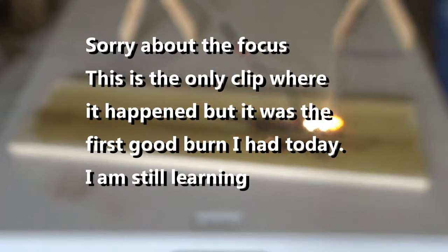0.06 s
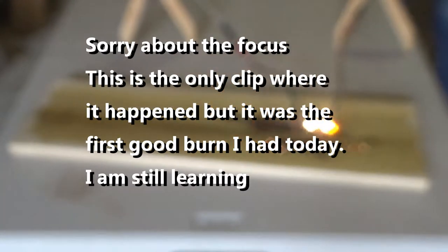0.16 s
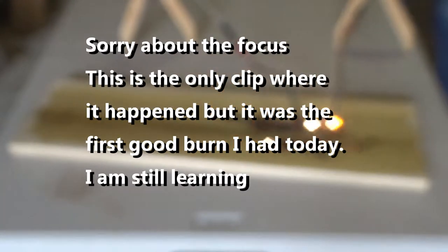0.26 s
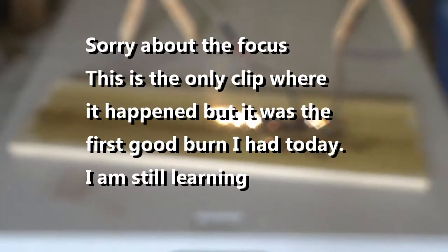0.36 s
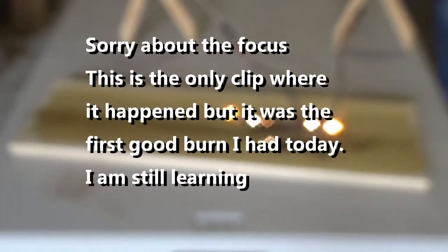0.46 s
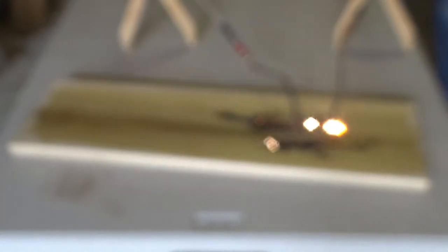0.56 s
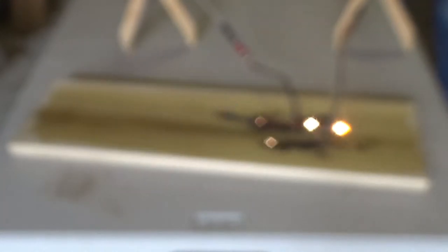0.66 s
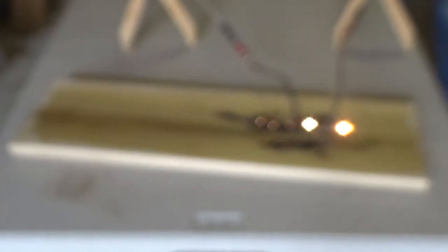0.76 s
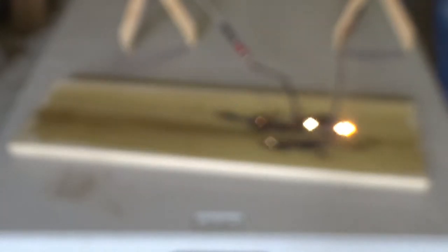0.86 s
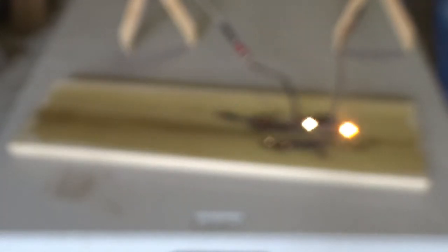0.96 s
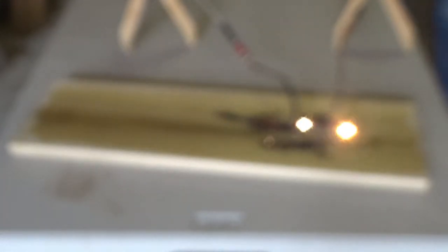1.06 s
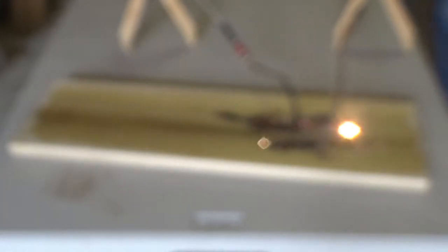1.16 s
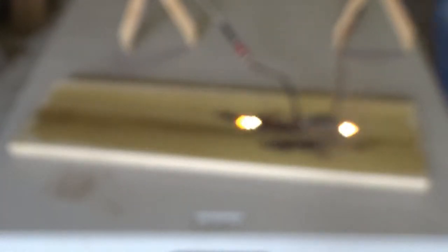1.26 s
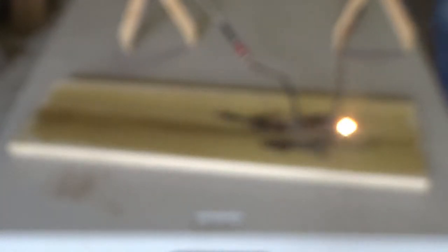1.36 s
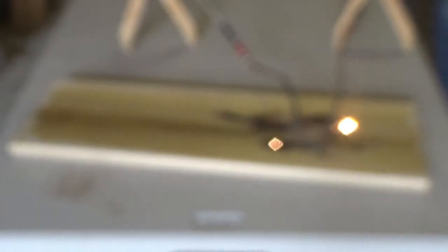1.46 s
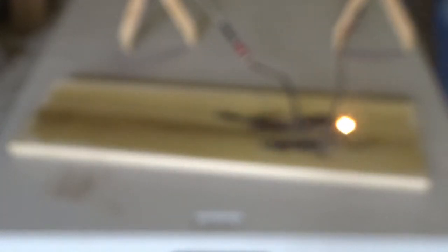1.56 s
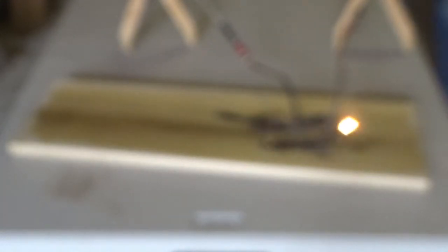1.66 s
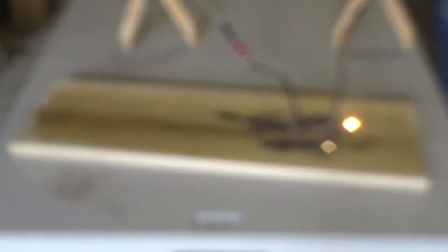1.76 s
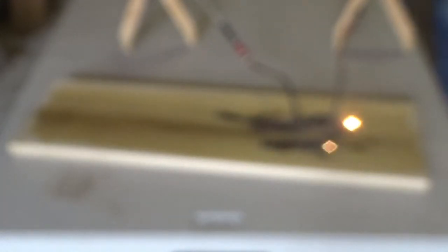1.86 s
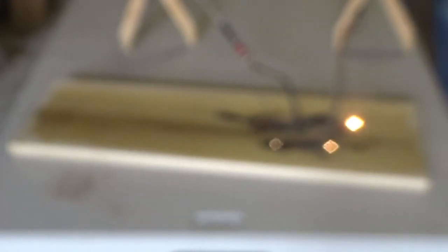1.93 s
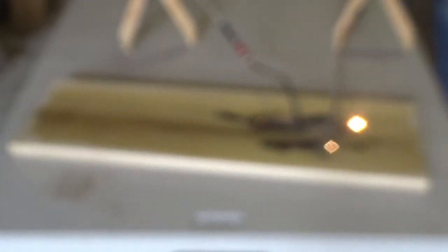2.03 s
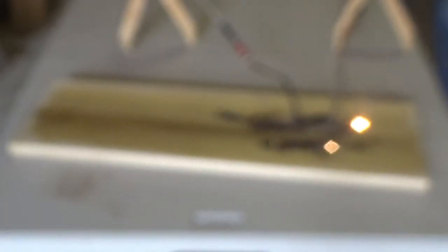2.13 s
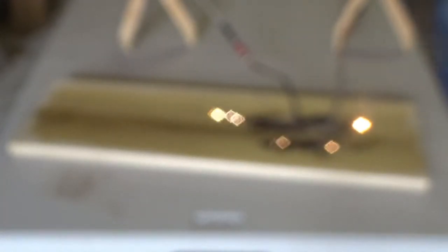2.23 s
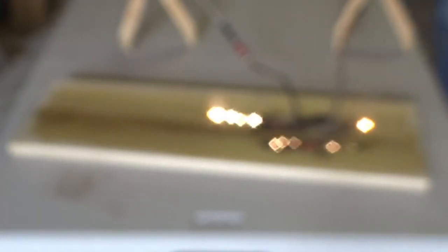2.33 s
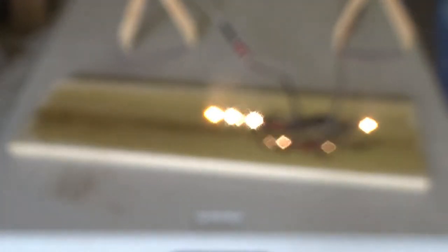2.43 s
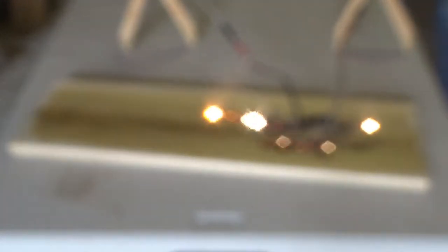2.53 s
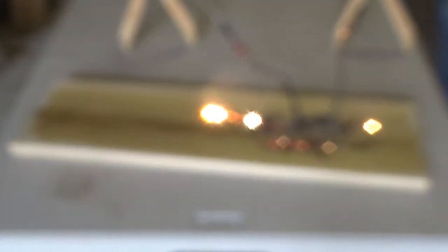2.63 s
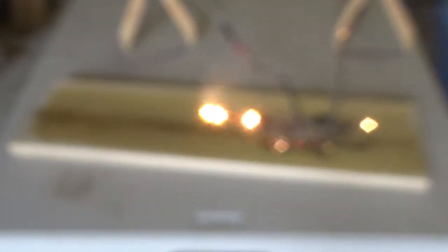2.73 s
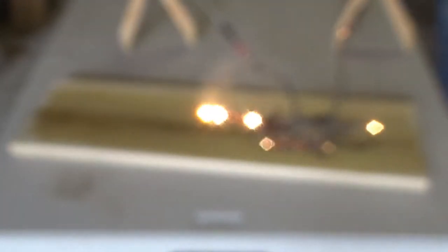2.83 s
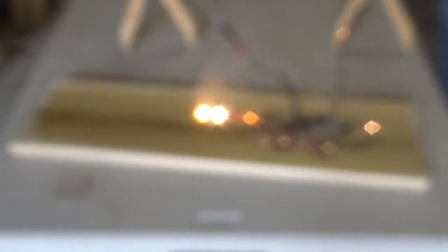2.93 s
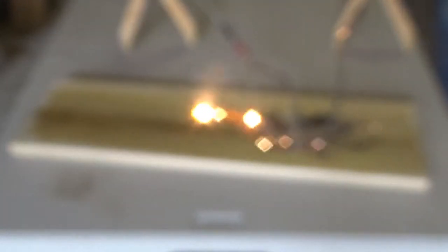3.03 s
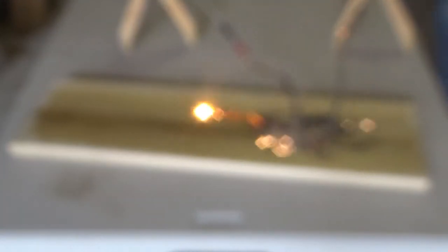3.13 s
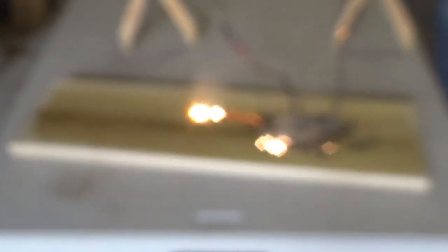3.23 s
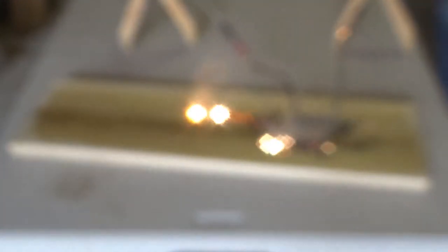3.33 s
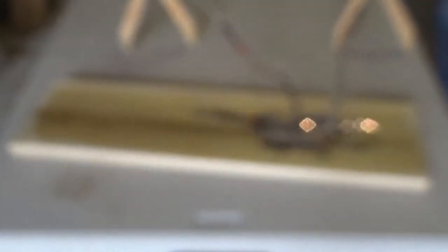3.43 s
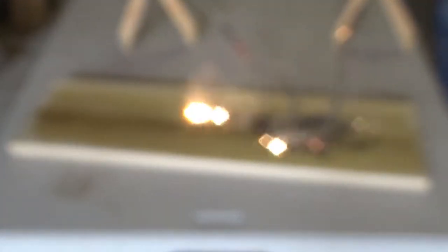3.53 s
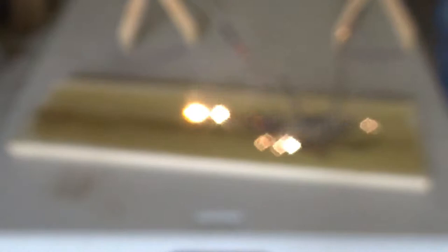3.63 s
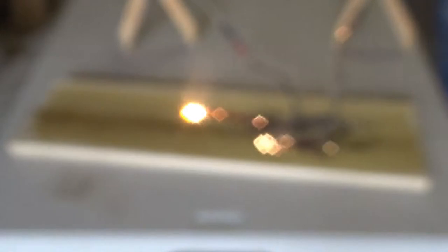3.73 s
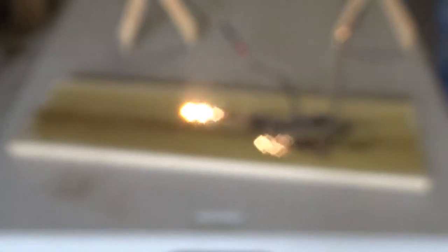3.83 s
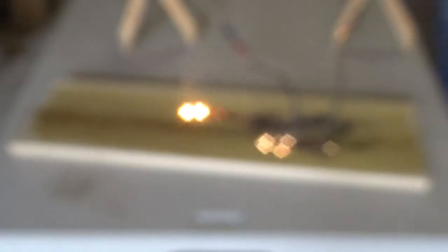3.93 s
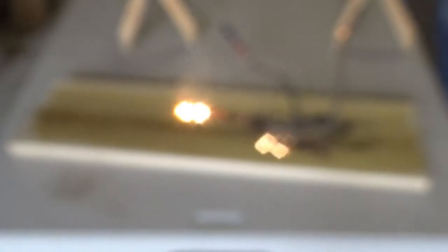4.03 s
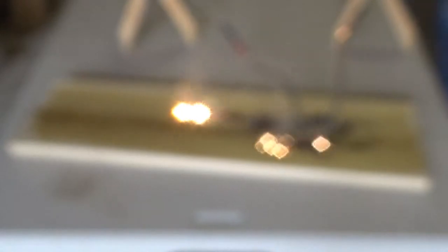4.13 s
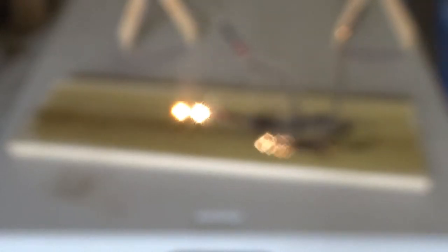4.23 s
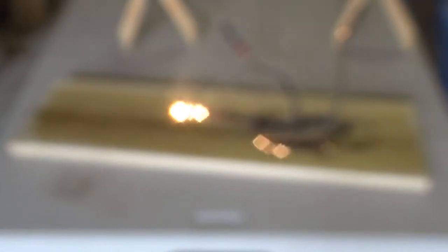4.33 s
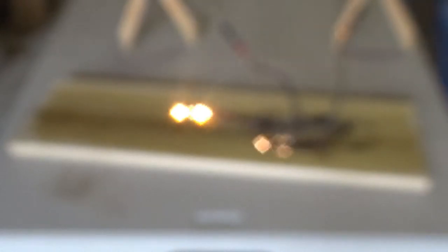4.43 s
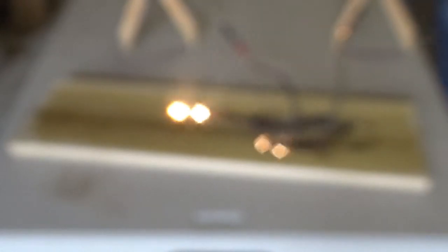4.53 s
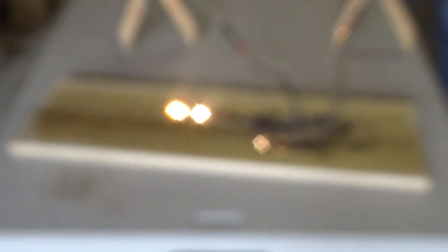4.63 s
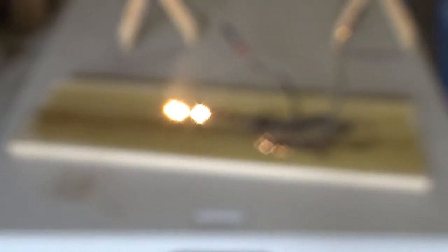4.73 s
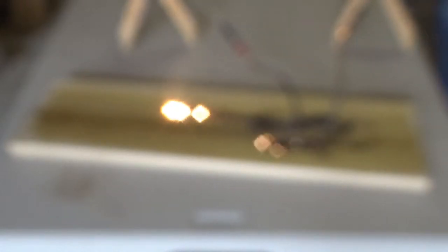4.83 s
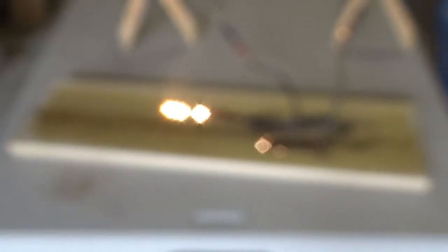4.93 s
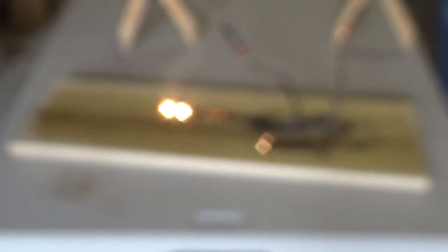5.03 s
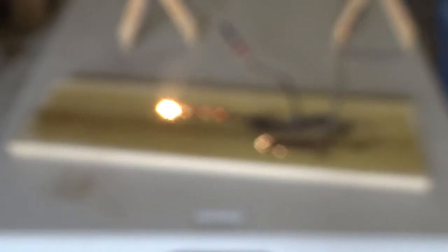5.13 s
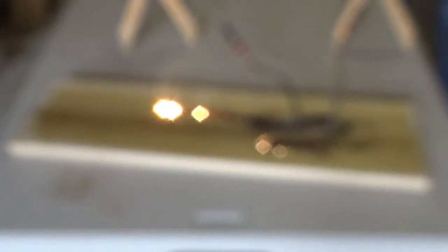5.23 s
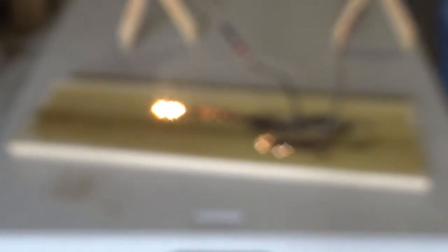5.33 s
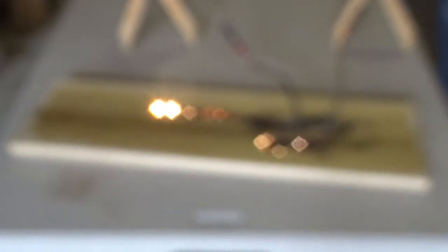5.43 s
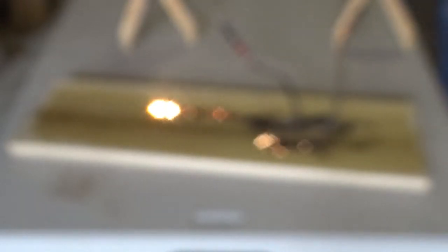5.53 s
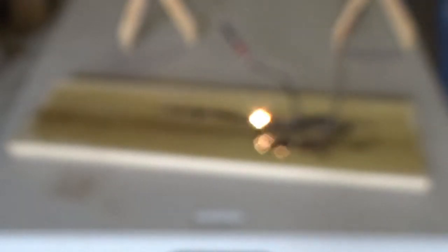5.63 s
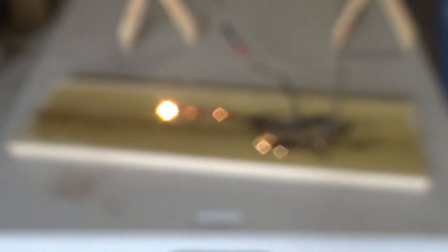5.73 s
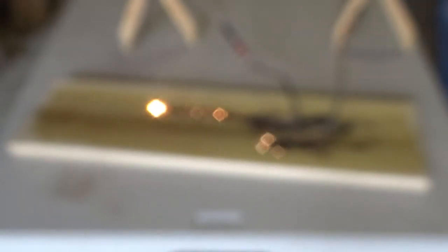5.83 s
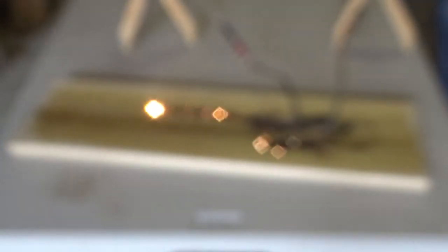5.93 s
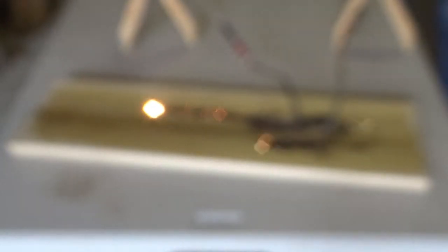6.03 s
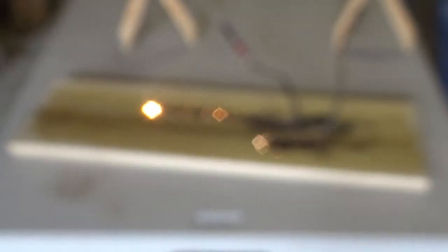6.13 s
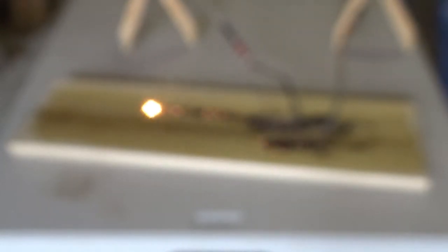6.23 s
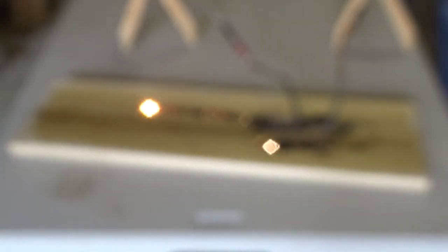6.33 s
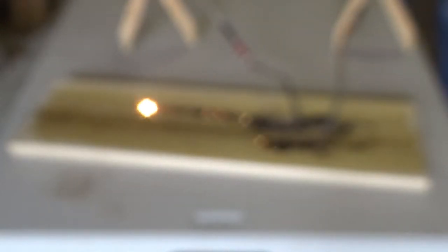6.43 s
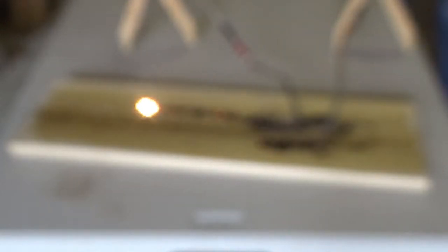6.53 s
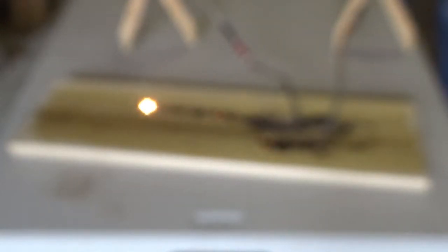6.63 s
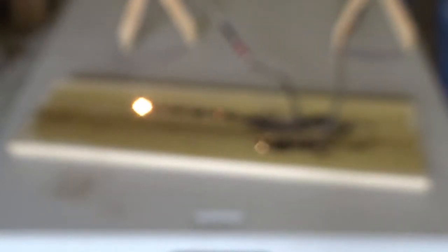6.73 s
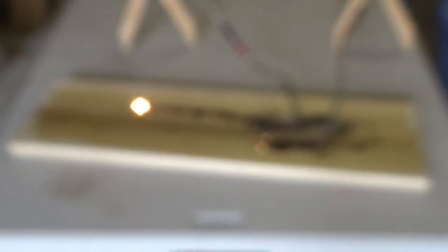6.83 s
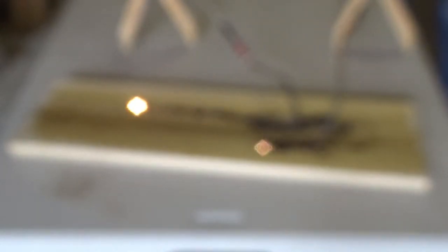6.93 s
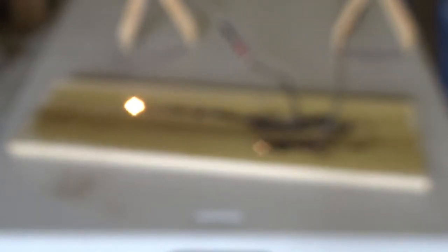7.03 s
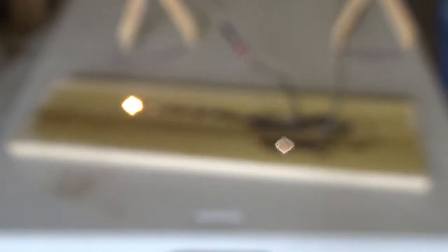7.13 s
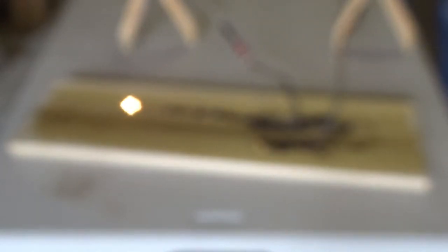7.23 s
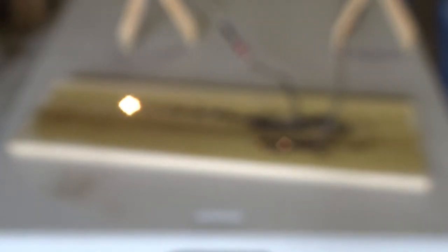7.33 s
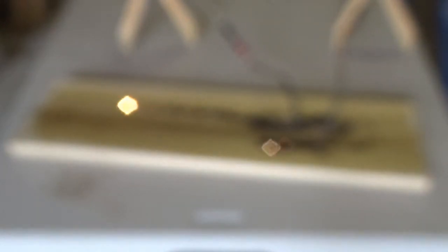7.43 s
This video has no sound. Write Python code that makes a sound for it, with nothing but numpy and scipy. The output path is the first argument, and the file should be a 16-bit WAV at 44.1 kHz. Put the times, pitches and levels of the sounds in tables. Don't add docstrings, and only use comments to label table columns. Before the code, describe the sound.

Close in a small workshop, electric arcs burn along a wet wooden board: a steady, raspy high buzz, dense bright crackling and boiling hiss. Hard snaps jump out irregularly. Around the middle the arc cuts out for an instant, exposing a thin transformer hum, then restrikes. A faint distant engine changes gear behind it. The buzz thins and the crackle weakens at the end. Stereo microphones catch short, hard room reflections.

```python
import sys
import numpy as np
from scipy import signal
from scipy.fft import rfft, irfft, next_fast_len
from scipy.io import wavfile
from scipy.ndimage import uniform_filter1d

SR = 44100
rng = np.random.default_rng(int(sys.argv[2]) if len(sys.argv) > 2 else 0)


def bounce(signal):
    frames = np.transpose(np.atleast_2d(signal))
    limited = np.clip(frames, -1, 1)
    pcm = np.round(limited * 32767).astype(np.int16)
    wavfile.write(sys.argv[1], SR, pcm)


def natural_amplitude(level_db):
    exponent = np.asarray(level_db, float) / 20
    return 10 ** exponent


N = 329427
T = np.arange(N) / SR
LEFT_RIGHT = np.array([[1], [-1]])

CYCLE_HZ = 240.0
CYCLES = T * CYCLE_HZ
STRIKE, BURN, THUMP = 0.425, 0.30, 0.275

# [t/s, spark strength level/dB, gas thump level/dB]
BURNS = [(0, -42, -55), (.44, -43, -45.5), (.6, -45.5, -50), (1.1, -45.5, -58), (1.75, -47.5, -60),
         (2.33, -47.5, -68), (2.62, -41, -46.5), (3.1, -40, -48.5), (3.46, -41, -45), (3.8, -41.5, -47),
         (4.02, -40.5, -52), (4.2, -42.5, -47), (4.97, -43.5, -53.5), (5.06, -42.5, -56), (6.6, -44, -71.5),
         (6.86, -48.5, -71.5), (7.34, -54.5, -75), (7.39, -60, -76)]
# [t/s, swell level/dB, dull sparks and steam against bright sparks level/dB]
FLARES = [(0.05, -2.5, -6), (0.239, -2, 2), (0.434, 2, 4.3), (0.534, -1, 3.5), (0.853, 2.2, -0.0),
          (1.063, -1.6, 3), (1.132, -3.5, 0), (1.312, 2, 6), (1.726, 2.5, 12.5), (2.18, 1.5, 4),
          (2.315, -3.5, -4), (2.913, -2.5, 1.5), (3.766, 2.3, -4), (4.24, -1, -3), (4.51, 5, 0),
          (4.684, -1.5, 0), (4.884, 3.5, -4), (5.113, 1.5, -6), (5.433, -2, -7), (5.807, -0.2, 7),
          (5.882, -1.5, 7), (6.136, 1.5, 1), (6.231, 2.3, 3), (6.316, -0.5, -2), (6.4, -0.5, -2.5),
          (6.53, 0.5, 3), (6.854, -3.5, 9), (6.994, 2.5, 2)]
FLARE_S = 0.024


def rms_one(x):
    return x / np.sqrt(np.mean(x ** 2) + 1e-20)


def in_time(rows):
    s, *columns = np.transpose(rows)
    return [np.interp(T, s, column) for column in columns]


def band(x, low_hz, high_hz):
    edges_hz = [low_hz, min(high_hz, 0.45 * SR)]
    return signal.sosfilt(signal.butter(2, edges_hz, "band", fs=SR, output="sos"), x)


def drift(rate_hz):
    r = np.exp(-80 * np.pi * rate_hz / SR)
    slow = signal.lfilter([1], [1, -2 * r, r * r], rng.standard_normal(N // 40 + 2002))
    slow = rms_one(slow[2000:])
    return np.interp(np.arange(N) / 40, np.arange(len(slow)), slow)


def coloured(x, spectrum):
    hz, level_db = np.transpose(spectrum)
    size = next_fast_len(N)
    log_hz = np.log(np.arange(1, size // 2 + 2) * SR / size)
    gain = natural_amplitude(np.interp(log_hz, np.log(hz), level_db))
    return rms_one(irfft(rfft(x, size) * gain, size)[:N])


def ring(clicks, hz, cycles):
    r = natural_amplitude(-60 * hz / (cycles * SR))
    w = 2 * np.pi * min(hz, 19000) / SR
    return signal.lfilter([0, np.sin(w)], [1, -2 * r * np.cos(w), r * r], clicks + 1e-18)


def swells(s, size, width_s):
    t = np.arange(0, N + 64, 64) / SR
    bells = np.exp(-((t[:, None] - s) / width_s) ** 2) @ size
    return np.interp(T, t, bells)


def alight():
    out_s, back_s = 3.4712, 3.5412
    recovery = np.clip(0.4 + (T - back_s) / 0.018, 0, 1)
    return uniform_filter1d((T < out_s) + (T > back_s) * recovery, size=40)


def strength():
    s, swell_db, dull_db = np.transpose(FLARES)
    spark_db = in_time(BURNS)[0]
    return spark_db + swells(s, swell_db, FLARE_S), swells(s, dull_db, FLARE_S)


def law(usual_db, spark_share, thump_share, wander_db):
    spark_db, thump_db = in_time(BURNS)
    spark_swing, thump_swing = spark_db + 43, thump_db + 54
    return usual_db + spark_share * spark_swing + thump_share * thump_swing + wander_db * drift(4.2)


def air(apart=0.29):
    # [f/Hz, level/dB]
    air_tone = [(100, -26), (200, -3), (400, 0), (1500, 1.5), (3500, 0.5), (6000, -16), (16000, -21.5)]
    # [f/Hz, level/dB]
    rumble_tone = [(15, -14), (70, -14), (115, 5), (160, 4), (250, -29)]
    mid, side = (coloured(rng.standard_normal(N), air_tone) for _ in range(2))
    low, low_side = (natural_amplitude(-74 + 2.0 * drift(3.0)) * coloured(rng.standard_normal(N), rumble_tone)
                     for _ in range(2))
    noise = natural_amplitude(-53) * (mid + apart * side * LEFT_RIGHT)
    return noise + low + 0.42 * low_side * LEFT_RIGHT


def bumps():
    # [t/s, peak level/dB]
    knocks = [(0.048, -75), (0.45, -68), (0.681, -62), (1.144, -66), (1.687, -63), (1.982, -63),
              (2.274, -64), (2.85, -68), (3.104, -69), (4.143, -56), (4.342, -60), (5.129, -56),
              (5.536, -55), (6.058, -58)]
    width_s = 0.036
    s, peak_db = np.transpose(knocks)
    mid, side = (rms_one(band(rng.standard_normal(N), 24, 127)) for _ in range(2))
    return swells(s + width_s, natural_amplitude(peak_db - 6.5), width_s) * (mid + 0.32 * side * LEFT_RIGHT)


def engine():
    # [t/s, f/Hz, level/dB]
    gears = [
        [(0, 373.6, -70), (.55, 402, -67), (1.0, 455, -71), (1.4, 508, -66), (1.75, 563, -82), (1.8, 568, -94)],
        [(.3, 578, -92), (.36, 577, -60), (.6, 586, -63), (.85, 568, -58.5), (1.08, 557, -70), (1.2, 552, -77)],
        [(1.93, 460, -77), (2.05, 440, -63), (2.4, 452, -66), (2.8, 472, -62), (2.9, 480, -97)],
        [(2.8, 369, -81), (3.3, 369, -71), (4.5, 367, -70.5), (5.7, 368.8, -68.5), (6.4, 367, -65),
         (6.7, 370, -76), (7.1, 370, -63.5), (7.3, 363, -68), (7.4, 369, -80)],
    ]
    out = 0
    for gear in gears:
        hz, db = in_time(gear)
        level = natural_amplitude(db + 1.0 * drift(2.0))
        out = out + level * np.sin(2 * np.pi * np.cumsum(hz + 1.05 * drift(6.8)) / SR)
    return np.sqrt(2) * out


def transformer():
    # [f/Hz, rms level/dB]
    tones = [(479.1, -57), (963.6, -55), (1443, -51), (1916, -50), (2078, -64), (2401, -51), (3354, -49)]
    hum = 0
    for hz, db in tones:
        level = np.sqrt(2) * natural_amplitude(db - hz / 450 + 1.4 * drift(30.0))
        hum = hum + level * np.cos(2 * np.pi * (hz * T + rng.random()))
    return (1 - alight()) * hum


def buzz(flutter=0.076):
    orders = (2, 4, 6, 8, 10, 14)
    # [usual level/dB, share of spark swing, share of thump swing]
    laws = [(-51.5, .4, .2), (-52.5, 0.01, 0.8), (-50.5, 0.59, -0.065), (-55.5, .5, -0.25),
            (-52.5, 0.43, 0.14), (-53.5, 0.46, 0.28)]
    faint = [(3, 2), (5, 10), (9, 10), (12, 8), (13, 14), (15, 14), (17, 14), (19, 14), (23, 14), (25, 14),
             (27, 14), (28, 14)]
    faint_db = [-15, -13, -12, -5, -8, -13, -13, -12, -12, -12, -13, -12]
    levels = {k: law(*row, 0.7) for k, row in zip(orders, laws)}
    s, swell_db, _ = np.transpose(FLARES)
    levels[4] = levels[4] + 0.3 * swells(s, swell_db, FLARE_S) + 1.4 * drift(14.0)
    levels.update({k: levels[leader] + db for (k, leader), db in zip(faint, faint_db)})
    out = 0
    for k, db in levels.items():
        at_strike = k in (8, 12) or k > 14
        crest = STRIKE + 0.02 if at_strike else THUMP + 0.5 + 0.09 / k
        level = np.sqrt(2) * natural_amplitude(db) * (1 + flutter * np.sqrt(k) * drift(41.0))
        out = out + level * np.cos(2 * np.pi * k * (CYCLES - crest))
    return alight() * out


def sizzle(patchy_db=2.5):
    # (level against sparks/dB, share of spark swing, share of thump swing, wander/dB)
    steam = (-6.5, 0.07, 0.36, 0.5)
    # [f/Hz, level/dB]
    hiss = [(150, -15.5), (300, -12), (500, -2), (800, -6.5), (1500, -0.5), (2600, 2.5), (3200, -4.5),
            (5000, -12)]
    mid_db, dull_db = strength()
    steam_db = law(*steam) + dull_db
    beat = 1 + 0.13 * np.cos(4 * np.pi * (CYCLES - THUMP))
    noise = coloured(rng.standard_normal(N) * beat * natural_amplitude(patchy_db * drift(35.0)), hiss)
    return alight() * natural_amplitude(mid_db + steam_db - 0.5) * noise


def snaps(swell=10.6, drop_db=-9.5):
    # [t/s, peak level/dB, top over middle level/dB]
    loud = [(0.0937, -15, 9), (0.1692, -11, 14), (0.2691, -11, 16), (0.4273, -19, 1), (0.5363, -7.5, -3),
            (0.851, -15, 1), (1.304, -17, -21), (1.473, -12, 4), (1.712, -13, -2), (2.4008, -13, -5),
            (2.6847, -7, -5), (2.968, -9, -4), (3.022, -11, -3), (3.4605, -17, 3), (3.8109, -10, -9),
            (3.914, -16, 2), (4.1816, -9, 6), (4.366, -10, 13), (4.498, -13, 0), (4.5025, -16, 9),
            (7.348, -24, 1), (4.927, -10, 6), (5.91, -16, 4), (6.81, -25, -3), (6.1182, -10, 2),
            (6.1484, -3, 27), (6.2397, -8, 15), (6.2767, -9.5, 1), (6.3857, -11, -2), (6.523, -13, 4)]
    # (t/s, peak level/dB, top over middle level/dB)
    first = (3.538, -28, 3)
    count = 40
    chance = rng.random(count)
    size, tint = rng.standard_normal((2, count))
    when = (np.floor(5 + chance * (N / SR * CYCLE_HZ - 9)) + STRIKE + BURN / 3) / CYCLE_HZ
    at = (when * SR).astype(int)
    small_db = strength()[0][at] + 14 + 0.5 * size - 60 * (alight()[at] < 1)
    small = zip(when, small_db, 7.5 + 6.3 * tint)

    out = np.zeros(N + 400)
    around = np.arange(-60, 140)
    for s, peak_db, top_db in [*loud, first, *small]:
        tear = 0.49 * rng.standard_normal(200) * np.exp(-abs(around) / swell)
        tear = tear - 0.85 * (around == -2)
        shape = 0.44 * band(tear, 1000, 4400) + band(tear, 4200, 8000)
        shape = shape + natural_amplitude(top_db - 1.0) * band(tear, 8800, 13000)
        level = natural_amplitude(min(peak_db + drop_db, -19))
        out[round(s * SR) - 60:][:200] += level * shape / abs(shape).max()
    return out[:N]


def sparks(per_s=12000., spread_db=2.0, cycle_db=1.5, tint_db=1.0, between_db=-24.0, ring_db=-14.0):
    # (level against sparks/dB, share of spark swing, share of thump swing, wander/dB)
    dull = (-4, -0.48, 0.19, 1.4)
    bright = (1.15, -0.23, 0.053, 1.2)
    # [f/Hz, level/dB, length/cycles]
    bench = [(6690, 5, 61), (8240, 0.5, 200), (9300, 0.5, 160), (15700, 5.5, 29)]
    mid_db, dull_db = strength()
    low_db, top_db = law(*dull) + 0.23 * dull_db, law(*bright)

    halves = 2 * (CYCLES - STRIKE + 1)
    which = halves.astype(int)
    weak = which % 2
    part = halves % 1 / (2 * np.where(weak, 0.11, BURN))
    burning = np.clip(part / 0.19, 0, 1) * np.clip((1.15 - part) / 0.5, 0, 1) * natural_amplitude(-4.5 * part)
    burning = burning + natural_amplitude(-9.0 - 0.9 * part) * weak
    burst = rng.standard_normal((which[-1] + 1, 4))[which]
    weak_db = (-9.5 + 2.5 + drift(3.1)) * weak
    gate = burning * natural_amplitude(weak_db + cycle_db * burst[:, 0] + 0.98 * drift(31.0)) + natural_amplitude(between_db)
    lit = alight()

    big_size = natural_amplitude(1.5 + spread_db * np.minimum(rng.exponential(1, N), 2))
    big = (rng.random(N) < 800. / SR) * rng.choice([-1, 1], N) * big_size
    bands = [(2790, 5450, low_db - 0.7), (5210, 9500, -0.0046), (8560, 18300, top_db + 0.33)]
    out = 0
    for k, (low_hz, high_hz, level_db) in enumerate(bands):
        size = natural_amplitude(spread_db * rng.exponential(1, N))
        clicks = (rng.random(N) < per_s / SR) * rng.choice([-1, 1], N) * size
        clicks = (clicks + big) * gate * lit
        layer = band(clicks * natural_amplitude(tint_db * burst[:, k + 1]), low_hz, high_hz)
        evened = layer / np.sqrt(uniform_filter1d(layer ** 2, size=5000) + 1e-9)
        out = out + natural_amplitude(level_db) * evened
    rings = sum(natural_amplitude(ring_db + db) * rms_one(ring(clicks, hz, cycles)) for hz, db, cycles in bench)
    hits = abs(big) * gate * lit
    pops = rms_one(band(-hits, 1000, 3060))
    ticks = rms_one(band(hits * (rng.random(N) < 0.12), 1760, 15500))
    return natural_amplitude(mid_db) * (out + rings + natural_amplitude(-9.0) * ticks + natural_amplitude(-17.5 + dull_db) * pops)


def shop(x):
    # [trip time/ms, ...]
    paths_ms = [
        (1.44, 2.0, 2.83, 3.92, 4.48, 6.53),
        (1.65, 2.3, 3.3, 4.1, 5.4, 7.3),
    ]
    t60_s, wall_cut_hz = 0.14, 15000
    size = next_fast_len(N + SR // 2)
    w = np.pi * np.arange(size // 2 + 1) / (size // 2)
    hz = w * SR / (2 * np.pi)
    spec = rfft(x, size) * np.sqrt((hz ** 2 + 900 ** 2) / (hz ** 2 + 3000 ** 2))
    dull = 1 / (1 + (hz / wall_cut_hz) ** 2) ** 0.075
    out = []
    for lags in (np.array(paths_ms) * SR / 1000).astype(int):
        loops = [natural_amplitude(-60 * d / SR / t60_s) * dull * np.exp(-1j * w * d) for d in lags]
        echoes = sum((-1) ** k * g / (1 - g) for k, g in enumerate(loops))
        out.append(irfft(spec * echoes, size)[:N])
    return out[0] + natural_amplitude(-2.5) * out[1] * LEFT_RIGHT


def scene():
    # [t/s, left minus right level/dB]
    lean = [
        (0, -0.5),
        (2.2, -0.6),
        (2.6, 0.5),
        (7.47, 1),
    ]
    crackle = sparks() + snaps() + sizzle()
    hum = buzz() + transformer()
    direct = (crackle + hum) * natural_amplitude(in_time(lean)[0] * 0.5 * LEFT_RIGHT)
    echoes = natural_amplitude(-19.5) * shop(crackle + 0.041 * hum)
    scatter = 0.18 * drift(90.0) * band(crackle, 6000, 17000) * LEFT_RIGHT
    fade = natural_amplitude(-5 * np.maximum(T - 6.9, 0))
    return direct + echoes + scatter + (engine() + air() + bumps()) * fade


def band_limit(x):
    return signal.sosfilt(signal.butter(12, 17000, fs=SR, output="sos"), x)


def record(dry):
    size = next_fast_len(N)
    spec = rfft(dry, size)
    hz = np.linspace(0, SR / 2, spec.shape[1])
    mix = irfft(spec * (hz < 15780), size)[:, :N]
    return band_limit(mix)


dry = scene()
out = record(dry)
bounce(out)
```